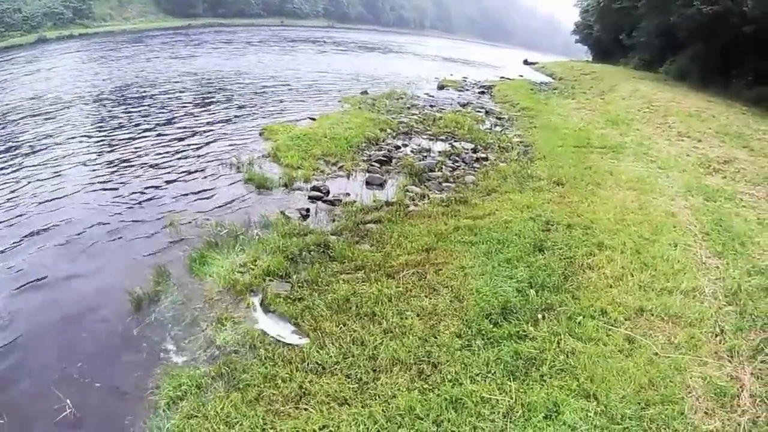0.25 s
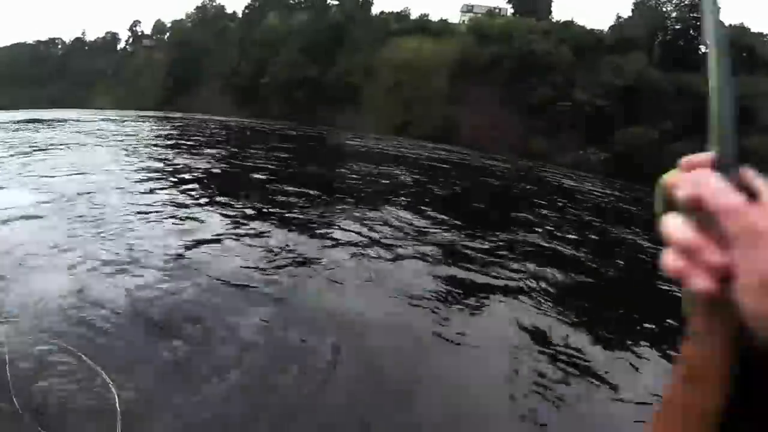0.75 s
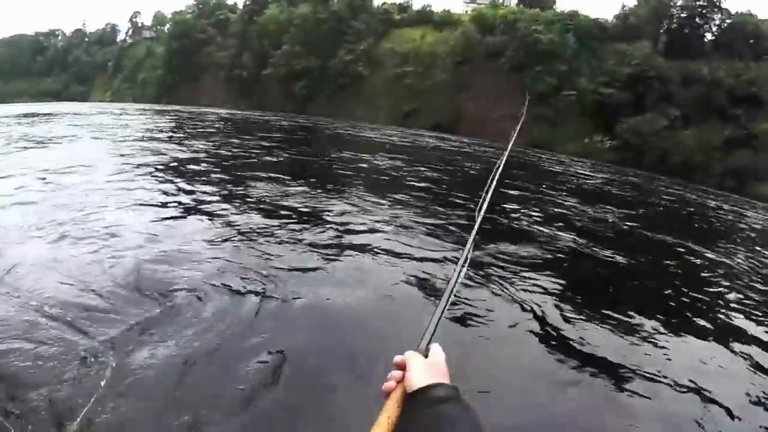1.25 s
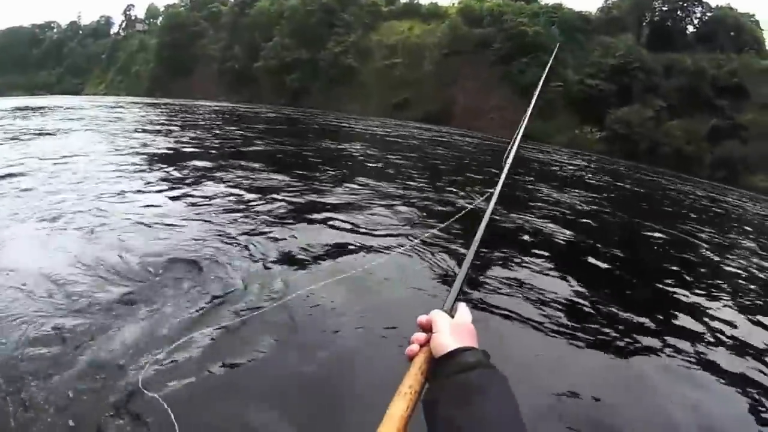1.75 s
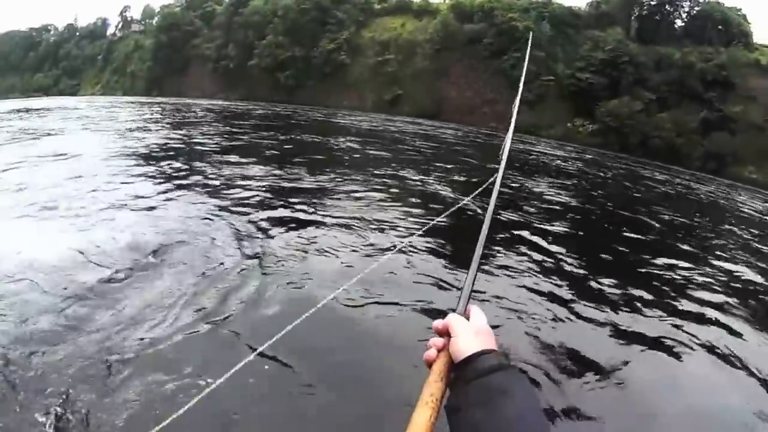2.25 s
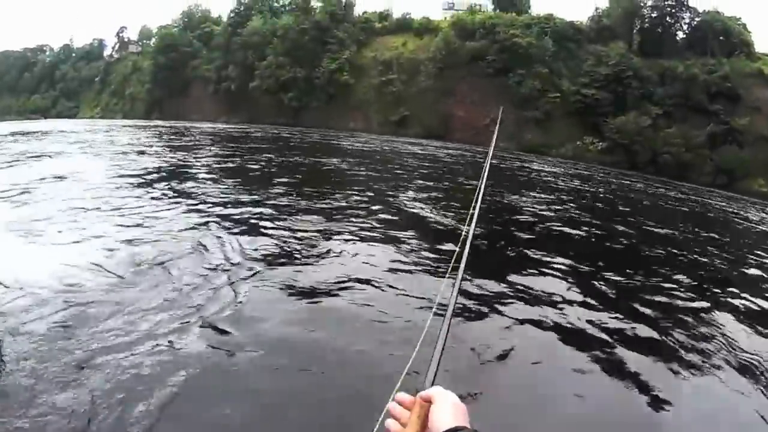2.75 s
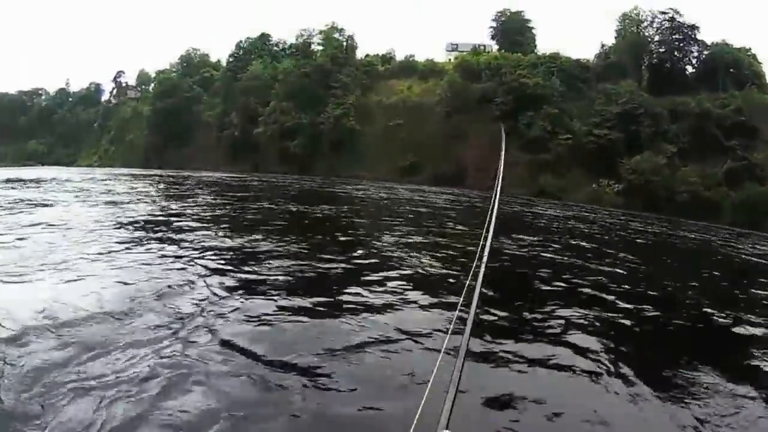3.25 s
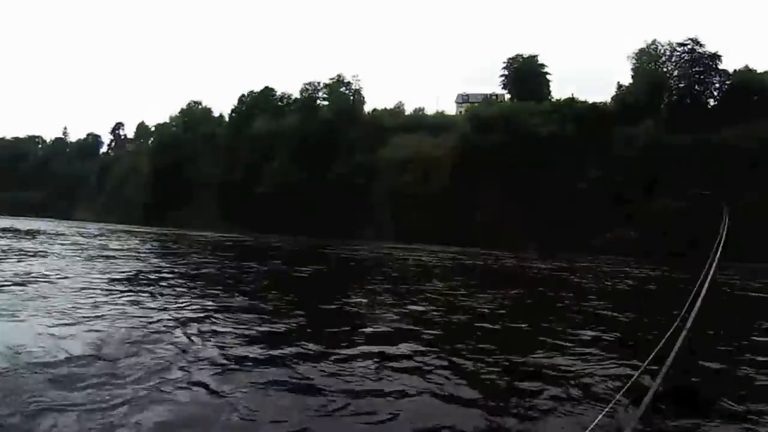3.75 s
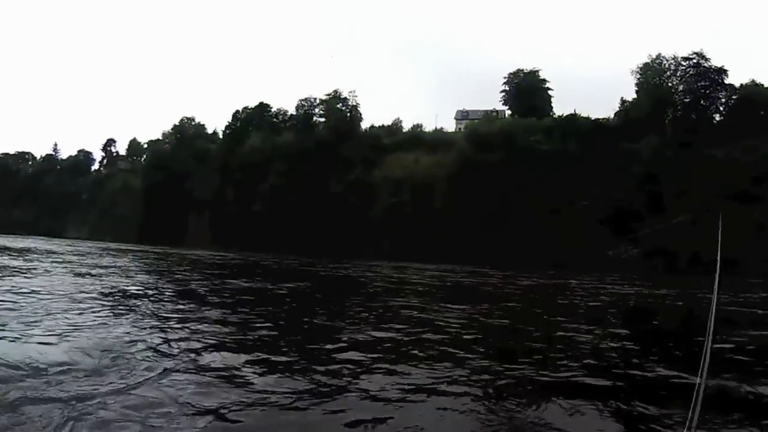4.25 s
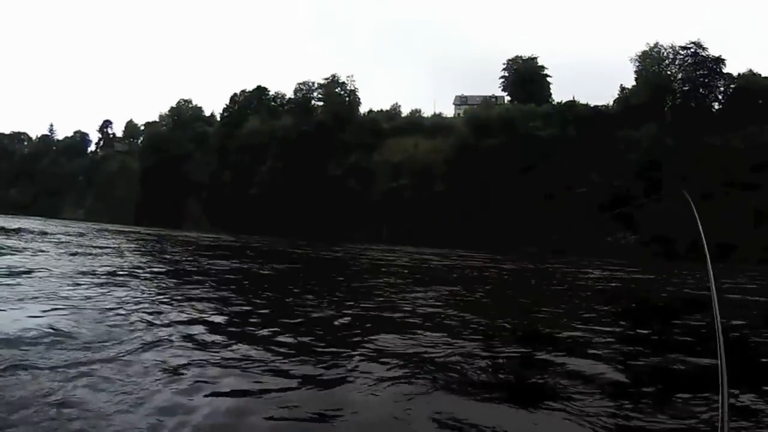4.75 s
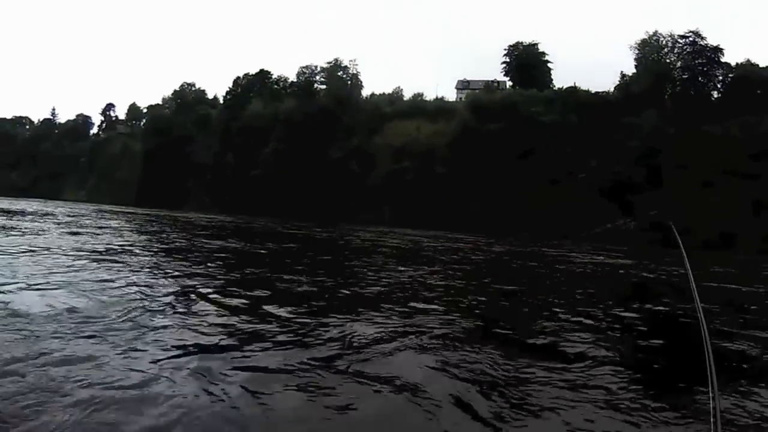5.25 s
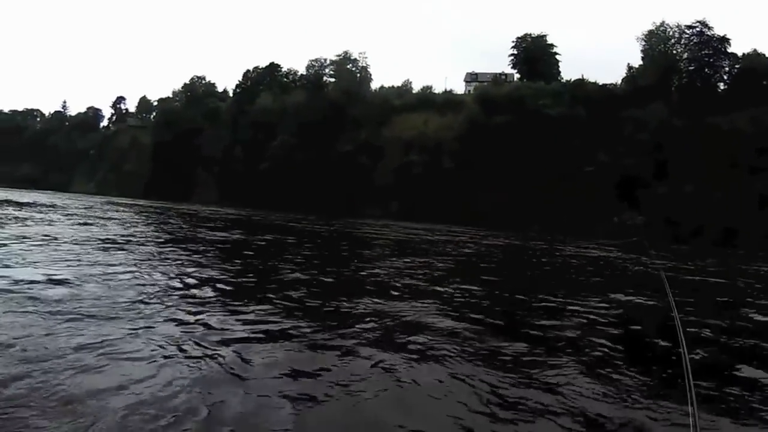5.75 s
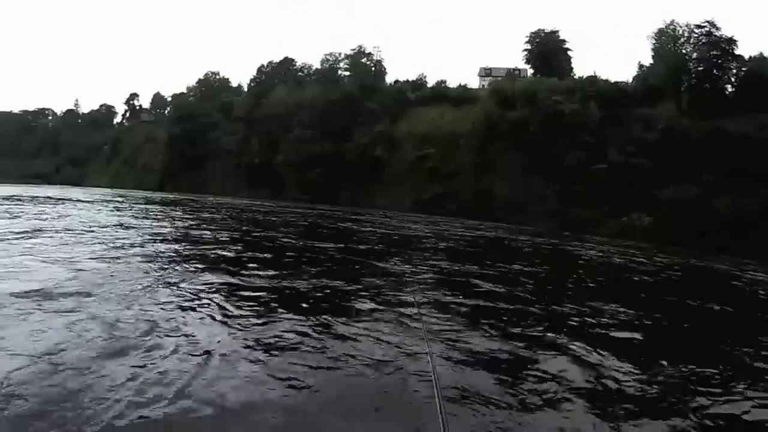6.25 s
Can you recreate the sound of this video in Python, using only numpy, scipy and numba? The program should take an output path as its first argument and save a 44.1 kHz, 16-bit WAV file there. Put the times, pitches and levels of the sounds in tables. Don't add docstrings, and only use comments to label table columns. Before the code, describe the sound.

Outdoor river heard through a closed waterproof case, dull and boxy with little treble. Quiet far water comes first, then an abrupt loud surge with heavy low wind buffeting and clipped, broken-up peaks. Afterwards the rush settles, with clear watery plinks, low glugs, ticks of drops and occasional thumps. A hard slap on the case precedes a short silent gap and a softer, gurgling close.

```python
import sys
import numpy as np
from scipy import signal
from scipy.fft import rfft, irfft, next_fast_len
from scipy.io import wavfile
from scipy.ndimage import uniform_filter1d
from numba import njit

SR = 44100
rng = np.random.default_rng(int(sys.argv[2]) if len(sys.argv) > 2 else 0)


def unload_wav(signal):
    wavfile.write(
        sys.argv[1],
        SR,
        np.round(np.clip(np.atleast_2d(signal).T, -1, 1) * 32767).astype(np.int16),
    )


def voltage_ratio(decibels):
    exponent = np.asarray(decibels, float) / 20
    return 10 ** exponent


N = 287532

# silent_s, fade_out_s, fade_in_s
FADES = [
    (0.753, 0.094, 0.049),
    (6.289, 0.078, 0.099),
]
# frequency_hz, level_db
HOUSING = [(20, -0.5), (1000, 1.5), (1500, -6.5), (2700, -20.5), (3500, -34), (3800, -42), (4000, -56.5),
           (4250, -39), (5200, -27), (6400, -22), (7200, -29.5), (7800, -46.5), (8200, -70.5)]


def curve(table, hz):
    f, db = np.transpose(table)
    return np.interp(np.log(np.maximum(hz, 1)), np.log(f), db)


def unit(x):
    return x / np.sqrt(np.mean(x ** 2))


def walk(rate):
    k = int(SR / rate)
    held = np.repeat(rng.standard_normal(N // k + 1), k)[:N]
    return unit(uniform_filter1d(uniform_filter1d(held, k), k))


def bands(table, shared_db, shared_rate, own_db, own_rate):
    size = next_fast_len(N, True)
    hz = np.arange(size // 2 + 1) * SR / size
    coloured = rfft(rng.standard_normal(size)) * voltage_ratio(curve(table, hz))
    swell = walk(shared_rate)
    lowest, highest = table[0][0], table[-1][0]
    out = 0
    for centre in lowest * 2 ** np.arange(np.log2(highest / lowest) // 1 + 2):
        octaves = np.clip(np.log2(np.maximum(hz, 1) / centre), -1, 1)
        band = irfft(coloured * np.cos(np.pi / 2 * octaves) ** 2, size)[:N]
        out = out + band * voltage_ratio(shared_db * swell + own_db * walk(own_rate))
    return unit(out)


def follow(takes, t):
    edges = [0] + [fade[0] for fade in FADES] + [N / SR]
    rows = []
    for take, a, b in zip(takes, edges, edges[1:]):
        rows += [(a, take[0][1]), *take, (b, take[-1][1])]
    s, db = np.transpose(rows)
    return np.interp(t, s, db)


def wind_strength(t):
    # time_s, level_db
    gust = [
        [(0.3, -67)],
        [(0.83, -49), (1.1, -45.5), (1.25, -41.5), (1.33, -56), (1.4, -45.5), (1.66, -63), (1.99, -50.5),
         (2.08, -62.5), (2.75, -67), (3.63, -65), (3.95, -54.5), (4.56, -56.5), (4.69, -47.5), (4.86, -47),
         (5.05, -60.5), (6.2, -62)],
        [(6.42, -72.5)],
    ]
    return follow(gust, t)


def water_strength(t):
    # time_s, level_db
    water = [
        [(0.0, -42), (0.64, -45)],
        [(0.83, -31.5), (0.99, -29.5), (1.16, -21.5), (1.27, -14.5), (1.47, -26), (2.0, -29), (2.6, -36),
         (2.86, -31), (3.4, -32.5), (4.05, -30.5), (4.51, -35), (4.88, -27.5), (5.62, -35), (6.2, -36)],
        [(6.38, -33), (6.49, -28.5)],
    ]
    return follow(water, t)


def both_drive(gust_db, water_db, usual_db, per_gust, per_water):
    usual_gust_db, usual_water_db = -58, -33
    return usual_db + per_gust * (gust_db - usual_gust_db) + per_water * (water_db - usual_water_db)


def rumble(gust_db, water_db, ashore):
    # frequency_hz, level_db (per Hz)
    bank = [(25, -2.5), (55, -1), (200, -2), (450, -2.5), (900, -13), (1600, -36)]
    # frequency_hz, level_db (per Hz)
    wind_colour = [(12, -1), (25, 5), (60, -0.5), (120, -4.5), (200, -7.5), (400, -16), (900, -36)]
    riffle = voltage_ratio(6.0) * bands(bank, 0.44, 14.0, 0.65, 19)
    wind = voltage_ratio(5.0) * bands(wind_colour, 2.94, 22, 2.2, 12)
    level_db = both_drive(gust_db, water_db, -36, 0.72, 0.46)
    return voltage_ratio(level_db) * np.where(ashore, riffle, wind)


def rush(water_db, ashore):
    # frequency_hz, level_db (per Hz)
    rush_colour = [(100, -13.5), (200, -9.5), (500, 0), (1000, 0.5), (1600, -8), (3000, -14.5),
                   (6000, -32.5)]
    return voltage_ratio(water_db - 1.5 - 1.7 * ashore) * bands(rush_colour, 1.9, 24, 2.6, 26)


def hiss(gust_db, ashore):
    # frequency_hz, level_db (per Hz)
    hiss_colour = [(150, -14), (500, -7), (1500, -11.5), (3000, -6.5), (4500, -3), (8000, 2.5)]
    lull_db = -64.5
    level_db = np.maximum(gust_db, lull_db) + 0.98 * walk(9)
    return voltage_ratio(level_db + 31.0 - 3.7 * ashore) * bands(hiss_colour, 1.7, 60, 0.62, 25)


def spray(spray_db, ashore):
    # frequency_hz, level_db (per Hz)
    spray_colour = [(700, -19), (1400, -9.5), (2200, -6.5), (3600, -4), (5000, -9.5), (8000, -21)]
    return voltage_ratio(spray_db + 22.0 + 11.6 * ashore) * bands(spray_colour, 2.2, 35, 2.6, 17)


@njit
def ring(rows, size):
    out = np.zeros(size)
    for s, gain, hz, t60, rise in rows:
        start = int(s * SR)
        for i in range(min(int(t60 * SR), size - start)):
            t = i / SR
            turn = 2 * np.pi * hz * (t + rise * t * t / 2 / t60)
            out[start + i] += gain * np.sin(turn) * (1 - np.exp(-2 * hz * t)) * 1000 ** (-t / t60)
    return out


def gurgle(count, low_hz, octaves, cycles, spread_db, most_db, slope_db):
    when, pitch, size, life, rise = rng.random((count, 5)).T
    hz = low_hz * 2 ** (octaves * pitch)
    gain = voltage_ratio(np.minimum(-spread_db * np.log(size), most_db) + slope_db * octaves * pitch)
    t60 = cycles * (0.4 + 2.0 * life ** 2) / hz
    return unit(ring(np.column_stack([when * N / SR, gain, hz, t60, 0.9 * rise]), N))


def fizz(water_db, spray_db, ashore):
    calm_db = -25
    pockets = gurgle(count=2100, low_hz=350, octaves=2.4, cycles=22, spread_db=5.0, most_db=15.0, slope_db=5.5)
    drops = gurgle(count=2400, low_hz=1250, octaves=2.5, cycles=9.9, spread_db=0.5, most_db=11.5, slope_db=5.0)
    pockets = voltage_ratio(np.minimum(water_db, calm_db) - 1.0) * pockets
    drops = voltage_ratio(np.minimum(spray_db + 17.0, calm_db) - 1.0) * drops
    return voltage_ratio(-9 * ashore) * (pockets + drops)


def gulp(t):
    # peak_s, level_db, pitch_hz, width_s
    slosh = (.612, -35, 212, .04)
    s, db, hz, width = slosh
    bell = np.exp(-((t - s) / width) ** 4)
    return voltage_ratio(db) * bell * np.sin(2 * np.pi * np.cumsum(hz * (0.85 + 0.14 * bell)) / SR)


def ticks():
    # start_s, thud_db, snap_db
    hits = [(0.837, -12, -34.5), (0.971, -25.5, -23.5), (1.09, -10.5, -32.5), (1.453, -8, -42),
            (1.71, -19, -44.5), (1.774, -20.5, -52), (1.847, -12, -59), (2.074, -24, -54),
            (2.193, -31, -40.5), (2.519, -30, -44), (2.633, -25, -54), (2.821, -16, -43),
            (2.933, -18.5, -55), (3.065, -22, -54), (3.854, -20, -56.5), (4.504, -13, -68),
            (4.895, -5, -46), (5.247, -22, -56), (5.291, -26, -46), (6.43, -16, -65), (6.494, -21, -60.5)]
    t60 = 0.013
    out, t = np.zeros((2, N)), np.arange(600) / SR
    for (s, *db), burst in zip(hits, rng.standard_normal((len(hits), len(t)))):
        start = int(s * SR)
        out[:, start:start + len(t)] += voltage_ratio(np.array(db))[:, None] * burst * 1000 ** (-t / t60)
    thud = signal.sosfilt(signal.butter(2, 2200, fs=SR, output="sos"), out[0])
    snap = signal.sosfilt(signal.butter(2, 3000, "high", fs=SR, output="sos"), out[1])
    return voltage_ratio(9.5) * thud + voltage_ratio(36) * snap


def bubbles():
    # start_s, level_db, pitch_hz
    drips = [(0.844, -21.5, 2200), (1.383, -7.5, 1470), (1.771, -27, 2240), (2.5, -35, 1900),
             (2.701, -37, 2010), (2.823, -28, 2560), (2.87, -32, 2780), (2.905, -36, 2800),
             (2.955, -34.5, 2900), (2.998, -26.5, 2100), (3.026, -18.5, 1470), (3.071, -28.5, 1910),
             (3.301, -25, 1870), (3.313, -32, 2700), (3.507, -21.5, 1540), (3.625, -34, 2400),
             (3.653, -20, 1550), (3.747, -33, 2510), (3.816, -24.5, 2030), (3.839, -26.5, 1980),
             (3.99, -23, 1910), (4.096, -29, 2420), (4.159, -19.5, 1620), (4.381, -21, 1610),
             (4.873, -24, 1930), (4.896, -11, 860), (6.03, -35, 2200), (6.345, -29, 2080),
             (6.45, -33.5, 2390), (6.496, -27.5, 2270)]
    # start_s, level_db, pitch_hz
    plinks = [(0.865, -16, 1510), (0.987, -6.5, 1197), (1.091, -7, 1078), (1.263, -6, 1002),
              (1.427, -8, 1555), (1.467, -11.5, 1460), (1.707, -15.5, 1190), (2.401, -27, 2160),
              (2.665, -19.5, 1060), (2.701, -23.5, 1380), (2.817, -26.5, 2080), (3, -15, 1690),
              (3.067, -18, 1285), (5.61, -19.5, 1024), (3.314, -18, 1490), (3.339, -18, 1330),
              (3.559, -16.5, 1470), (3.612, -21.5, 1600), (3.854, -13.5, 1130), (3.875, -18.5, 1390),
              (4.097, -17, 1740), (4.304, -27.5, 2370), (4.319, -17.5, 1100), (4.34, -23.5, 1950),
              (5.171, -14, 1080), (5.39, -15.5, 1316), (6.178, -19.5, 990), (6.22, -21.5, 1336),
              (6.412, -23, 1700), (6.496, -16.5, 1376)]
    # start_s, level_db, pitch_hz, t60_s, pitch_rise (share over t60)
    glugs = [(1.344, -7.5, 844, 0.07, 4.4), (0.971, -15.5, 945, 0.12, 1.54),
             (1.955, -14.5, 750, 0.062, 0.28), (2.333, -14.5, 755, 0.1, 0.64),
             (2.36, -11, 350, 0.077, 0.23), (2.359, -5, 884, 0.044, 0.087), (2.766, -19, 410, 0.097, 0.018),
             (2.817, -18, 956, 0.19, 1.16), (2.818, -18.5, 512, 0.094, 1.9),
             (3.001, -16.5, 438, 0.13, 1.14), (3.023, -21, 458, 0.24, 0.27),
             (3.066, -14.5, 887, 0.079, 0.64), (3.237, -19, 479, 0.28, 1.16), (3.283, -18, 518, 0.17, 1.07),
             (3.597, -21.5, 496, 0.17, 0.02), (3.875, -12, 595, 0.14, 0.066),
             (3.875, -4.5, 863, 0.02, 0.57), (4.093, -19.5, 576, 0.096, 0.49), (4.32, -10, 727, 0.13, 0.05),
             (4.874, -17, 964, 0.12, 0.16), (5.147, -12.5, 584, 0.2, 0.95), (5.192, -4, 357, 0.073, 0.66),
             (6.366, -22.5, 504, 0.22, 0.084), (6.49, -17.5, 720, 0.085, 0.28)]
    knocks = [
        (6.115, 3.5, 289, 0.024, 0.013),
        (6.114, -10, 660, 0.027, 0.068),
        (5.195, -13.5, 273, 0.093, 0.1),
        (6.326, -20, 760, 0.093, 0.16),
    ]
    small = []
    for table, cycles, rise in ((plinks, 48, 0.25), (drips, 33, 0.44)):
        small += [(s, db, hz, cycles / hz, rise) for s, db, hz in table]
    rows = np.array([*glugs, *small, *knocks], float)
    rows[:, 1] = voltage_ratio(rows[:, 1] - curve(HOUSING, rows[:, 2]))
    return ring(rows, N)


def buffets(t):
    # peak_s, level_db, swing_hz
    pushes = [(0.858, -24, 76), (0.951, -20, 89), (1.15, -13, 51), (1.164, -5, 149), (1.213, -2, 200),
              (1.226, -2, 53), (1.252, 6, 111), (1.281, -8.5, 52), (1.378, 0.5, 128), (1.411, 1.5, 89),
              (1.435, 6, 147), (1.458, -8, 140), (1.563, -17.5, 27), (1.993, -12, 127),
              (2.062, -14.5, 25.9), (2.065, -14, 157), (2.239, -13.5, 91), (3.925, -12, 74),
              (4.067, -6.5, 57), (4.092, -7.5, 87), (4.385, -12, 124), (4.683, -10, 92),
              (4.718, -13.5, 170), (4.81, -10.5, 113), (4.896, -7, 247), (5.104, -11.5, 32),
              (5.747, -16, 64), (5.815, -12.5, 112), (5.854, -12, 95)]
    # peak_s, level_db, swing_hz
    pulls = [(0.876, -20.5, 150), (1.1, -12.5, 84), (1.178, -1, 128), (1.198, 2.5, 120), (1.211, -9.5, 20),
             (1.327, -1, 16), (1.419, -9.5, 19), (2.137, -20.5, 21), (3.02, -19, 11), (3.737, -18, 130),
             (3.998, -14.5, 120), (4.152, -13.5, 40), (4.528, -18, 83), (4.771, -12.5, 150),
             (4.905, -12, 35), (4.927, -10, 122), (5.016, -14.5, 77), (5.085, -7, 126), (5.311, -18, 74),
             (5.39, -20.5, 50), (5.57, -16, 61), (5.836, -16.5, 21), (6.119, -11, 43), (6.12, -6.5, 71)]
    out = np.zeros(N)
    for sign, rows in ((1, pushes), (-1.06, pulls)):
        for (s, db, hz), turn in zip(rows, 0.058 * rng.standard_normal(len(rows))):
            near = slice(int((s - 3 / hz) * SR), int((s + 3 / hz) * SR))
            phase = hz * (t[near] - s)
            pulse = np.exp(-1.6 * np.abs(phase / 0.69) ** 0.74)
            out[near] += sign * voltage_ratio(db) * pulse * np.cos(2 * np.pi * (phase + turn))
    return out


def scene():
    t = np.arange(N) / SR
    ashore = t < FADES[0][0]
    water_db, gust_db = water_strength(t), wind_strength(t)
    spray_db = both_drive(gust_db, water_db, -52.5, 0.71, 0.75)
    steady = rumble(gust_db, water_db, ashore) + rush(water_db, ashore)
    steady = steady + hiss(gust_db, ashore) + spray(spray_db, ashore)
    single = gulp(t) + ticks() + bubbles() + buffets(t)
    return (steady + fizz(water_db, spray_db, ashore) + single)[None]


def stall(x, t):
    # start_s, length_s, stuck_value
    stalls = [
        (1.193, 0.0033, -0.74),
        (1.2154, 0.0044, -.68),
        (1.249, 0.0033, -1.1),
        (1.2505, .003, 2.4),
        (1.274, 0.0036, -0.62),
        (1.2993, 0.017, 0.22),
        (1.431, 0.0021, -0.77),
    ]
    drain_s, leak = 0.014, 0.04
    for s, length, value in stalls:
        stuck = (t >= s) * np.clip(3 * (s + 1.2 * length - t) / length, 0, 1)
        x = x + (1 - leak) * stuck * (value * np.exp(-np.abs(t - s) / drain_s) - x)
    return x


def half_housing():
    cepstrum = irfft(np.log(voltage_ratio(curve(HOUSING, np.arange(1025) * SR / 2048) / 2)))
    cepstrum[1:1024] *= 2
    cepstrum[1025:] = 0
    return irfft(np.exp(rfft(cepstrum)))


def clip_at_rail(x):
    rail = 0.66
    return rail * np.tanh((np.abs(x) / rail) ** 3) ** (1 / 3) * np.sign(x)


def band_limit(x):
    return signal.sosfilt(signal.butter(12, 7990, fs=SR, output="sos"), x)


def record(dry):
    t, half = np.arange(N) / SR, half_housing()
    x = stall(dry[0], t)
    x = signal.fftconvolve(x, half)[:N]
    x = clip_at_rail(x)
    x = signal.fftconvolve(x, half)[:N]
    for s, fade_out, fade_in in FADES:
        x = x * np.clip(np.maximum((s - t) / fade_out, (t - s) / fade_in), 0, 1)
    return band_limit(x[None])


dry = scene()
out = record(dry)
unload_wav(out)
```